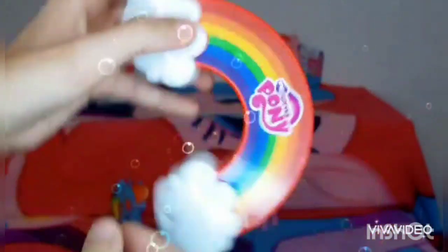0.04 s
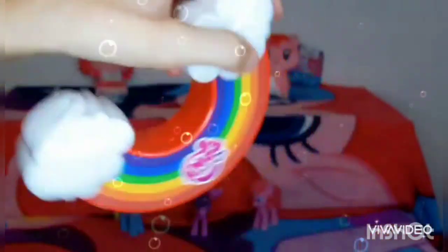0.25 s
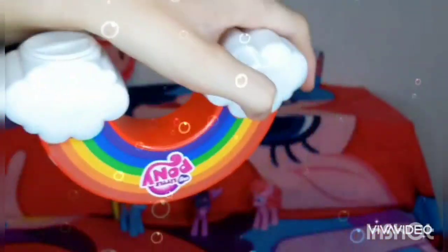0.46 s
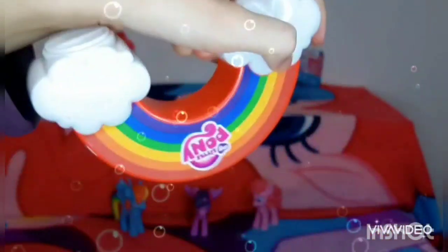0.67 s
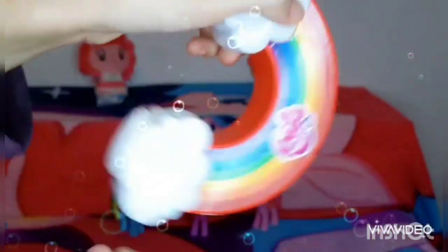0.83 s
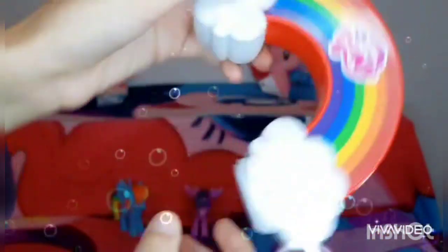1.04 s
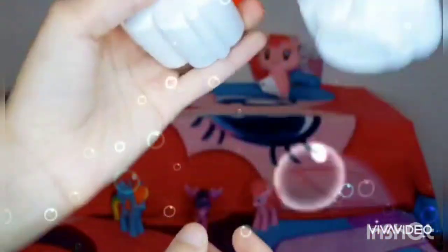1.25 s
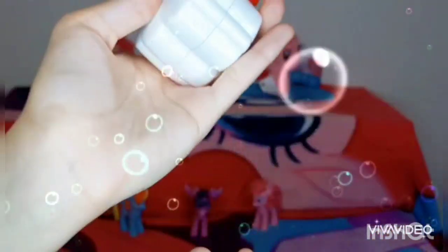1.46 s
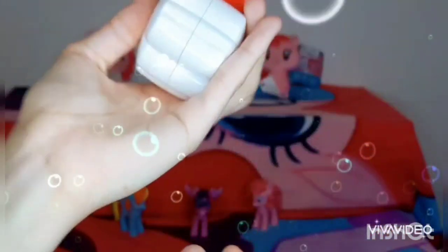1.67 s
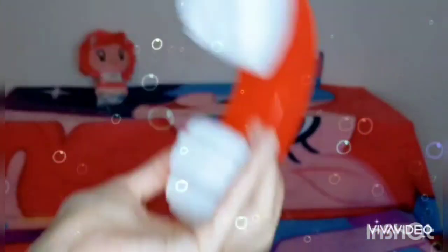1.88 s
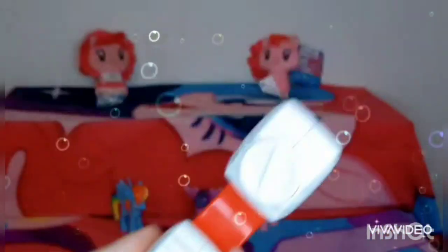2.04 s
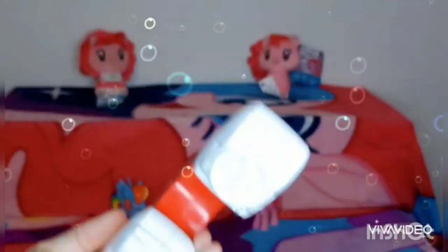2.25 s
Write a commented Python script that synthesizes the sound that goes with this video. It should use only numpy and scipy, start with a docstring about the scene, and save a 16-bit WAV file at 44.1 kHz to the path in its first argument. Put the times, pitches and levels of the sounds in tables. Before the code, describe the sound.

A coin rattles and clatters inside a hollow plastic piggy bank as it is turned over

```python
"""A coin tumbles inside a hollow, arch-shaped plastic piggy bank turned over by hand close to the microphone.
Faint rumble and a low hum run throughout a small, dry room. Skittering slides, made of dense ticks, start at once;
a first cluster of knocks, each a burst of contact force, soon joins. After a lull comes a longer rattle from
0.6 s to 1.6 s, then a pause, and a last hard tumble from about 1.95 s to 2.2 s. The wall filters every contact
through the modes of the hollow body; short reflections follow, and a recorder gates, clips and low-passes the sum."""
import sys
import numpy as np
from scipy import signal
from scipy.fft import rfft, irfft
from scipy.io import wavfile
from scipy.ndimage import uniform_filter1d

SR = 44100
rng = np.random.default_rng(int(sys.argv[2]) if len(sys.argv) > 2 else 0)


def generate_wav(signal):
    """Clip the signal to [-1, 1] and save it as 16-bit WAV at the path in sys.argv[1]."""
    frames = np.transpose(np.atleast_2d(signal))
    scaled = np.clip(frames, -1, 1) * 32767
    pcm = np.round(scaled).astype(np.int16)
    wavfile.write(sys.argv[1], SR, pcm)


N = 101826  # length in samples
BLOCK = 8192  # samples computed for one knock; slides and the room use twice as many
CRACK_S = 0.0023  # decay time of a contact, to 1/e
SIDES = np.array([[1], [-1]])  # left and right signs of a difference signal


def undb(db):
    """Level to amplitude: 20 dB is a factor of ten."""
    return 10 ** (np.asarray(db) / 20)


def hz_axis(size):
    """Discrete Fourier bins: frequencies spaced by SR / size, with the lowest held at 1 Hz for logarithms."""
    return np.maximum(np.arange(size // 2 + 1) * SR / size, 1)


def curve(f, points):
    """Spectral envelope: dB points joined by straight lines on a log-frequency axis."""
    hz, db = np.array(points, float).T
    return np.interp(np.log(f), np.log(hz), db)


def bump(f, hz, width_hz):
    """Lorentzian resonance: 1 at its centre and one half at width_hz to either side."""
    return 1 / (1 + ((f - hz) / width_hz) ** 2)


def causal(db):
    """Minimum phase: folding the cepstrum onto positive time gives a causal filter with this dB curve."""
    cepstrum = irfft(db * np.log(10) / 20)
    half = len(cepstrum) // 2
    cepstrum[1:half] *= 2
    cepstrum[half + 1:] = 0
    return np.exp(rfft(cepstrum))


def hiss(size):
    """Incoherence: two independent white noises of rms 1."""
    return rng.standard_normal((2, size))


APART_HZ = 2700  # the two sides grow apart around this frequency


def stereo(pair, f):
    """Spatial coherence: two unrelated spectra become sides alike in the bass and apart in the treble."""
    apart = f / np.hypot(f, APART_HZ)
    return (pair[0] + SIDES * apart * pair[1]) / np.sqrt(1 + apart ** 2)


def add(out, start, x):
    """Superposition: mix x into out from a time in seconds."""
    i = max(int(start * SR), 0)
    out[:, i:i + x.shape[1]] += x[:, :max(N - i, 0)]


FLOOR_DB = -60.5  # rms level of the rumble
HUM_HZ, HUM_DB = 49.7, -68  # centre and rms level of the hum

# Spectral shape of the room noise. Each row: frequency in Hz, relative level in dB per Hz.
RUMBLE_SHAPE = [(20, -18.5), (45, 3.5), (80, -4), (150, 0), (300, -6.5), (600, -17), (1500, -27),
                (4000, -32), (11000, -27.5), (14000, -49)]


def background(side=0.35, hum_width_hz=4):
    """Filtered noise: a shaped spectrum gives the rumble, and a narrow band beats randomly as an unsteady hum."""
    f = hz_axis(N)
    middle, difference = irfft(rfft(hiss(N)) * undb(curve(f, RUMBLE_SHAPE)), N)
    rumble = middle + side * difference * SIDES
    hum_band = np.exp(-((f - HUM_HZ) / hum_width_hz) ** 2)
    hum = irfft(rfft(rng.standard_normal(N)) * hum_band, N)
    return rumble / rumble.std() * undb(FLOOR_DB) + hum / hum.std() * undb(HUM_DB)


BODY_DB = 5.5  # level of all modes together, against the direct sound
MODE_SCATTER_DB, MODE_DETUNE = 0.5, .012  # standard deviations per contact: level, and fraction of frequency

# Modes of the hollow body. Each row: frequency in Hz, relative level in dB, 60 dB decay time in seconds.
BODY_MODES = [(500.5, -2, 0.076), (548.5, 0, 0.13), (872.3, -9, 0.092), (957, 2.5, 0.067),
              (1003, -5.5, 0.19), (1397, -8, 0.036), (1779, -6.5, 0.16), (1873, -4.5, 0.1),
              (1958, -2, 0.064), (2681, -9.5, .08), (2820, -4, .08), (3150, -8.5, .07), (3825, -1, 0.051),
              (4176, -4, 0.21)]


def body(f):
    """Modal superposition: direct sound plus damped resonances, which every contact excites differently."""
    chance = rng.standard_normal((len(BODY_MODES), 2))
    ring = 0
    for (hz, db, t60), (louder, sharper) in zip(BODY_MODES, chance):
        centre = hz * (1 + MODE_DETUNE * sharper)
        decay = t60 / np.log(1000)  # to 1/e
        ring = ring + undb(db + MODE_SCATTER_DB * louder) / (1 + 2j * np.pi * (f - centre) * decay)
    return 1 + undb(BODY_DB) * ring


EVEN_HZ = 500  # width of the band over which a force's spectrum is evened out

# Colour the plastic gives a contact. Each row: frequency in Hz, relative level in dB per Hz.
PLASTIC_COLOUR = [(60, -40), (200, -25), (330, -10), (500, -4), (700, -2.5), (1000, 1.5), (1450, -1.5),
                  (2000, 6), (2800, 8), (4000, 2.5), (6000, -5), (8000, -10), (10500, -10.5), (13000, -30)]


def wall(force, bass_db, treble_db, spot_db=0):
    """Source-filter radiation: evened contact forces, at unit mid-band energy, pass through wall and body."""
    size = force.shape[1]
    f, pair = hz_axis(size), rfft(force)
    smooth_power = uniform_filter1d(abs(pair) ** 2, int(EVEN_HZ * size / SR))
    uneven = 10 * np.log10(smooth_power + 1e-9)
    tilt = curve(f, [(1100, bass_db), (1800, 0.017), (3800, 0.019), (6000, treble_db)])
    colour = curve(f, PLASTIC_COLOUR) + tilt + spot_db
    sides = stereo(pair * np.array([causal(colour - u) for u in uneven]), f)
    middle = (f > 1500) & (f < 4500)
    energy = np.sum(abs(sides[:, middle]) ** 2) / size  # before the body rings
    radiated = irfft(sides * body(f))[:, :-size // 4]  # the last quarter is dropped
    return radiated / np.sqrt(energy)


GRAINS_PER_S, GRAIN_SPREAD_DB = 2000, 3.5  # mean tick rate; scale of the random tick levels
SLIDE_FADE_S = 0.0068  # fade at either end of a slide
SOFT_BELOW_DB, SOFT_DULLING = -42.5, .6  # under this level, dB of treble lost per dB
SLIDE_RING_HZ, SLIDE_RING_WIDTH_HZ, SLIDE_RING_DB = 950, 59, 3.5  # wall resonance that sliding brings out

# Slides of the coin. Each row: start in seconds, end in seconds, mid-band level in dB, bass tilt in dB,
# treble tilt in dB, swell from start to end in dB.
COIN_SLIDES = [(0, 0.065, -59.5, 5.5, 10, -7.5), (0.069, 0.259, -48, 5.5, 10, -1),
               (.28, .35, -62, 13, -2, 5), (0.378, 0.434, -70, 17, -12.5, -11),
               (0.508, .545, -60.5, 12.5, 0, 7), (.555, 0.605, -55, 7, 3, 7.5),
               (0.597, .66, -43.5, -15, 11, 0.5), (.72, 0.795, -44.5, -25, 10.5, -1.5),
               (.955, 0.995, -38, -0.5, 9.5, -4), (1.045, 1.195, -51, 3, 4, 2),
               (1.235, 1.275, -35, -4.5, 4.5, 2), (1.301, 1.366, -41.5, -1.5, 2, -20.5),
               (1.439, 1.515, -48, -4.5, 0.5, -2.5), (1.515, 1.603, -45.5, -1, 6, 5.5),
               (1.902, 1.915, -68.5, 3, 26.5, 2), (1.987, 2.057, -34, -23, 2.5, -11),
               (2.06, 2.139, -31.5, -1, 3, -1.5), (2.164, 2.186, -38.5, -2, -0.5, -2)]


def slides():
    """Friction as random micro-impacts: the coin's rim skitters in dense, tiny ticks of uneven size."""
    out, size = np.zeros((2, N)), 2 * BLOCK
    t, f = np.arange(size) / SR, hz_axis(size)
    for start, end, db, bass, treble, swell_db in COIN_SLIDES:
        length = max(end - start, SLIDE_FADE_S)
        fade = np.clip(np.minimum(t, length + SLIDE_FADE_S / 2 - t) / SLIDE_FADE_S, 0, 1)
        env = fade * undb(swell_db * np.minimum(t / length, 1))
        struck = rng.random(size) < GRAINS_PER_S / SR
        ticks = struck * undb(GRAIN_SPREAD_DB * np.minimum(rng.exponential(size=size), 4))
        decaying = signal.lfilter([1], [1, -np.exp(-1 / (CRACK_S * SR))], ticks)
        force = decaying * env * hiss(size)
        # a light slide is duller
        dull = curve(f, [(2100, 0.015), (3200, SOFT_DULLING * min(db - SOFT_BELOW_DB, 0))])
        ring = SLIDE_RING_DB * bump(f, SLIDE_RING_HZ, SLIDE_RING_WIDTH_HZ)
        add(out, start, wall(force, bass, treble, dull + ring) * np.sqrt(length * SR) * undb(db))
    return out


ATTACK_S = .0005  # rise of a knock
GRAZE_DB, GRAZE_S = -15, .003  # the rim grazes the wall just before it strikes
SHELL_S, SHELL_DB = 0.0053, 3  # the wall's shiver: decay to 1/e, level against the crack
SPOT_WIDTH_HZ = 180  # half-width of the struck spot's resonance
CAVITY_HZ, CAVITY_WIDTH_HZ = 535, 160  # centre and half-width of the cavity's thump

# Knocks of the coin. Each row: time in seconds, mid-band level in dB, bass tilt in dB, treble tilt in dB,
# ring of the struck spot in Hz, height of that ring in dB, thump of the cavity in dB.
COIN_KNOCKS = [(0.0646, -24, 3.5, 5.5, 1070, 10.5, 13.5), (0.091, -25, 1, 6, 1200.0, 17.5, 5),
               (0.1114, -16, -7.5, 7.5, 3700, 7, 14.5), (0.1422, -27, 8.5, -5, 970, 3, -4),
               (0.167, -20.5, -7, 12, 5270, -15, -3.0), (0.1695, -17, 6, 8.5, 5640, 8.5, -3.0),
               (0.2157, -17.5, -1.5, 8.5, 1740.0, 16, 8), (0.2325, -23, 1, 6, 1686, 12.5, 9.5),
               (0.237, -26, 8.5, -18, 1770, 22, -1.5), (0.329, -43, 3.5, 1.5, 1790, 18, -5),
               (0.6099, -21.5, 4.0, -10, 2970.0, 6.5, 3.5), (0.6231, -21, 10, 7.5, 3040, 8, -31),
               (0.6671, -13, 4.0, 12, 5700, 1.5, 4), (0.6709, -38, 19, -10, 890, 8, 3.0),
               (0.7177, -14, -5.5, 7.0, 3580, 9.5, 2), (0.7391, -22, 5.5, 18, 6600, 2.5, 1.5),
               (0.7633, -26, 21.5, 11.5, 990, -4.5, -4.5), (0.7916, -25, -4, 6, 1870.0, -0.5, -19),
               (0.8539, -18, 3, 10, 3990, 13, 2.5), (0.9174, -21, 11, 14, 3814, 13, -18.5),
               (0.95, -19, -2.5, 5.5, 2860, -10.5, 5), (0.9581, -22, 8.0, 10.5, 2900, 14.5, -4.5),
               (0.9807, -21.5, 5, 1.0, 2860, 5, -15), (0.996, -27.5, -13, -9, 2950, -28, -2),
               (1.009, -33.5, 7.5, 5, 2770, 5, -7), (1.0847, -31, 3, 6, 3680.0, 11.5, -35),
               (1.1122, -33.5, -12.5, -2, 980, 23, -34), (1.1431, -32.5, 2.5, -5, 910, 9, -4),
               (1.1982, -19.5, -4, 7, 1870, -1, 1.5), (1.202, -20, -13, 5, 2820, 11, 11),
               (1.2232, -7.5, -11.5, 1.5, 2960, -1.5, 5), (1.2317, -13.5, 5, 2.5, 2620, 9.5, 7),
               (1.2549, -25, -6.5, 1.0, 3840, 10.5, 22.5), (1.3053, -20.5, -4.5, 3.0, 2820, 9, -1),
               (1.312, -28, -4, 8, 4060, 3, -3), (1.3255, -32, -18, 4.5, 3830, 6.0, -15),
               (1.4518, -41, -22, -18, 2060, -1, 1), (1.5157, -32, -5, 7, 3820, 15, -8),
               (1.527, -31, 4, -13, 2800, 7.5, -8), (1.5416, -39.5, 4, 11, 3690, 10, -8),
               (1.5535, -26, -4, 2.0, 2950, 7, 11), (1.577, -32, -2, 7.5, 3110, 8, 8.5),
               (1.583, -29, 4.5, -1.0, 3125, 15, -5), (1.9575, -37, 1, 19.5, 6190, 12.5, -25),
               (1.9635, -12.5, -1, 10, 2710, 17.5, -2), (1.9791, -15, 3.5, 13, 2590, 14, 6),
               (1.982, -19, 5.5, -8.5, 2500, -3, -3), (2.0215, -27.5, 4.5, 13.5, 4860, 8, -14),
               (2.0591, -27, 0, 4, 2030, 12, -1), (2.0695, -22.5, 2.5, 12.5, 2740, 14, 3.5),
               (2.0849, -7.5, 4.5, 9.5, 2780, 8, -7), (2.0878, -35, 12.5, 16.5, 2700, 15.5, 10.5),
               (2.1093, -23, 4, 4, 3260, 1, 2), (2.124, -21, -1, -2.5, 2830.0, 5, -2),
               (2.1275, -20.5, -4.5, -3.5, 2700, -1, -5), (2.1393, -29.5, -13.5, 5, 2070, 6.5, 0.5),
               (2.165, -33, 7.5, -3, 3900, -2, 0.5)]


def knocks(span_s=0.0029):
    """Impact excitation: graze, crack and shiver of the wall, coloured by struck-spot and cavity resonances."""
    out, f = np.zeros((2, N)), hz_axis(BLOCK)
    t = np.arange(BLOCK) / SR
    after = np.maximum(t - GRAZE_S, 0)  # time since the strike
    crack = np.exp(-after / CRACK_S)
    shiver = undb(SHELL_DB) * np.exp(-after / SHELL_S)
    graze = undb(GRAZE_DB) * np.minimum(t / GRAZE_S, 1) * crack
    env = (crack + shiver) * np.minimum(after / ATTACK_S, 1) + graze
    for start, db, bass, treble, hz, ring_db, thump_db in COIN_KNOCKS:
        spot = ring_db * bump(f, hz, SPOT_WIDTH_HZ)
        thump = thump_db * bump(f, CAVITY_HZ, CAVITY_WIDTH_HZ)
        force = np.sign(hiss(BLOCK)) * env  # random signs
        x = wall(force, bass, treble, spot + thump)
        # the listed time falls halfway up the attack
        add(out, start - GRAZE_S - ATTACK_S / 2, x * np.sqrt(span_s * SR) * undb(db))
    return out


ROOM_DB, ROOM_T60_S, ROOM_DELAY_S = -10.5, 0.18, .005  # reflected level, 60 dB decay time, first delay


def room(x):
    """Reverberation by convolution: exponentially decaying noise gives dense reflections of table and walls."""
    size = 2 * BLOCK
    t = np.arange(size) / SR
    tail = hiss(size) * np.exp(-np.log(1000) * t / ROOM_T60_S) * (t > ROOM_DELAY_S)
    tail = irfft(stereo(rfft(tail), hz_axis(size)))
    tail /= np.sqrt(np.sum(tail ** 2) / 2)  # unit energy per side
    mono = x.sum(0)[None] / np.sqrt(2)
    return x + undb(ROOM_DB) * signal.fftconvolve(mono, tail)[:, :N]


LEAD_S = .00003  # how much earlier the sound reaches the left side

# Balance of the bank and its reflections. Each row: frequency in Hz, left minus right in dB.
SIDE_BALANCE = [(450, 4), (800, 2.5), (1400, 0.5), (5000, -1), (8000, -0.4), (11000, 2.5)]


def scene():
    """Interaural-style cues: level balance and a linear-phase delay place the bank; background is added after."""
    x, f = rfft(room(knocks() + slides())), hz_axis(N)
    lean = curve(f, SIDE_BALANCE) * SIDES / 2
    late = np.exp(-2j * np.pi * f * LEAD_S * np.array([[0], [1]]))  # delays the right
    return irfft(x * undb(lean) * late, N) + background()


GATE_DB, GATE_DEPTH_DB = -46.5, 5  # noise suppressor: level of half depth, greatest reduction
GATE_S, GATE_ABOVE_HZ = 0.013, 300  # its averaging time and lower band edge
TOP_HZ = 11200  # low-pass cutoff


def record(dry):
    """Downward expansion: a noise suppressor lowers all but the bass when quiet; then peak clipping, low-pass."""
    high_pass = signal.butter(2, GATE_ABOVE_HZ, "high", fs=SR, output="sos")
    high = signal.sosfiltfilt(high_pass, dry)
    power = uniform_filter1d(np.mean(high ** 2, axis=0), int(GATE_S * SR) + 1)
    power = np.maximum(power, 0)
    gain = undb(-GATE_DEPTH_DB / (1 + power / undb(GATE_DB) ** 2))
    gated = dry - high + high * gain
    low_pass = signal.butter(12, TOP_HZ, fs=SR, output="sos")
    return signal.sosfilt(low_pass, np.clip(gated, -1, 1))


dry = scene()
out = record(dry)
generate_wav(out)
```